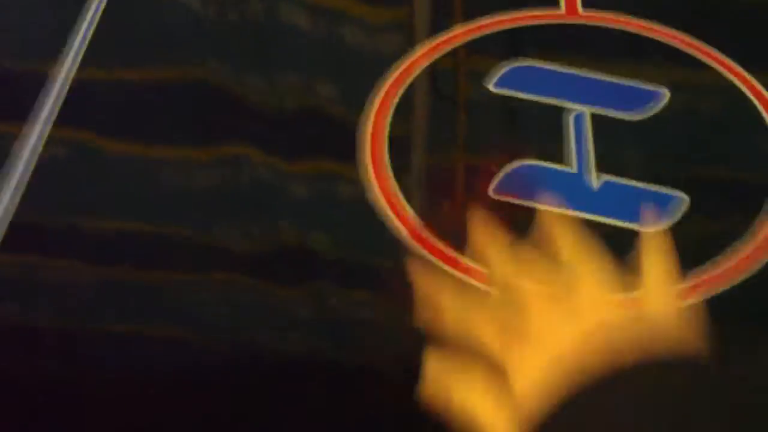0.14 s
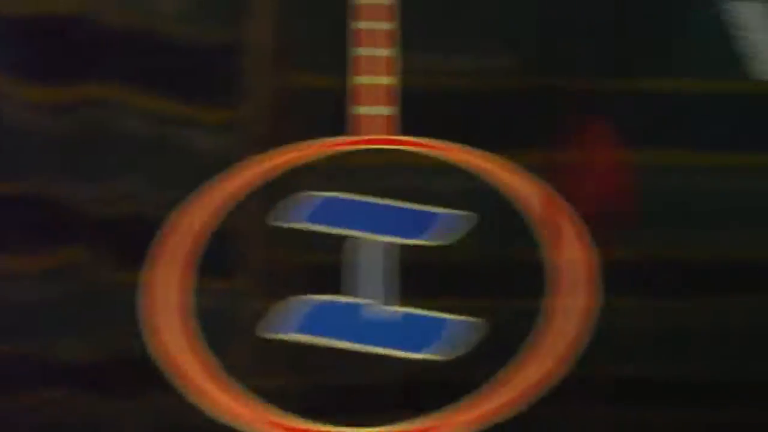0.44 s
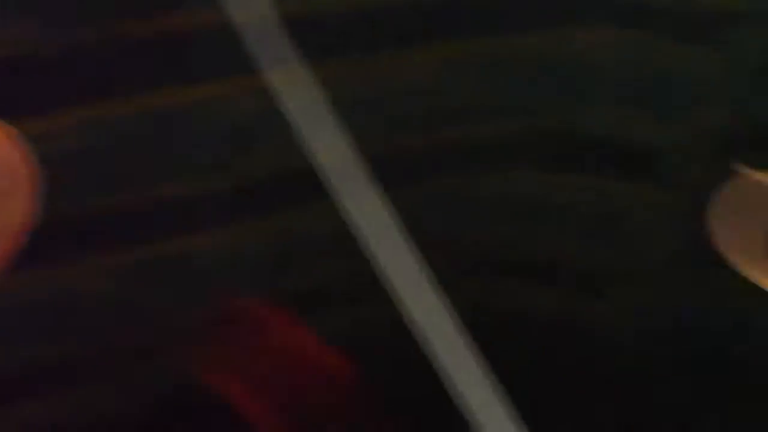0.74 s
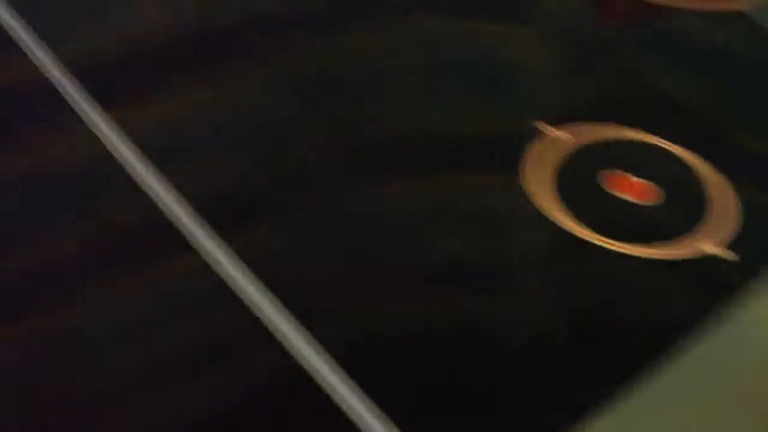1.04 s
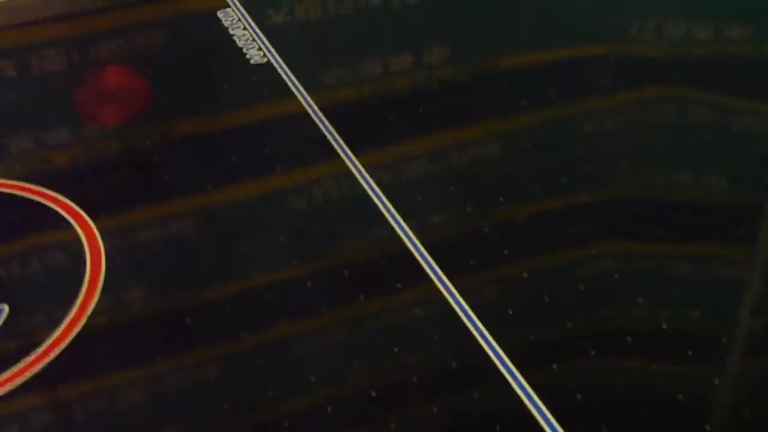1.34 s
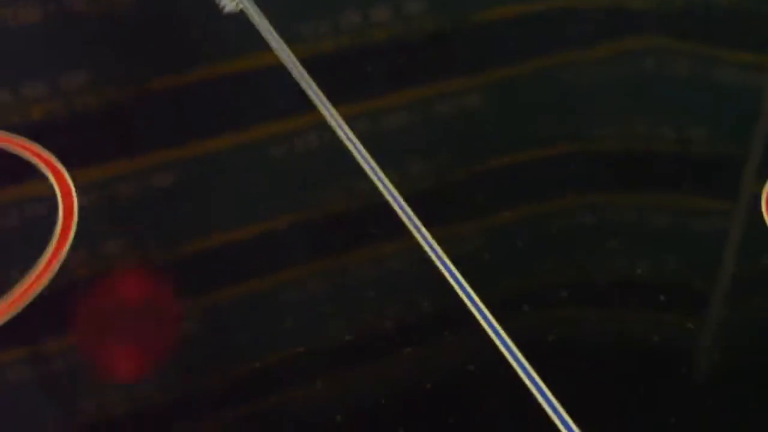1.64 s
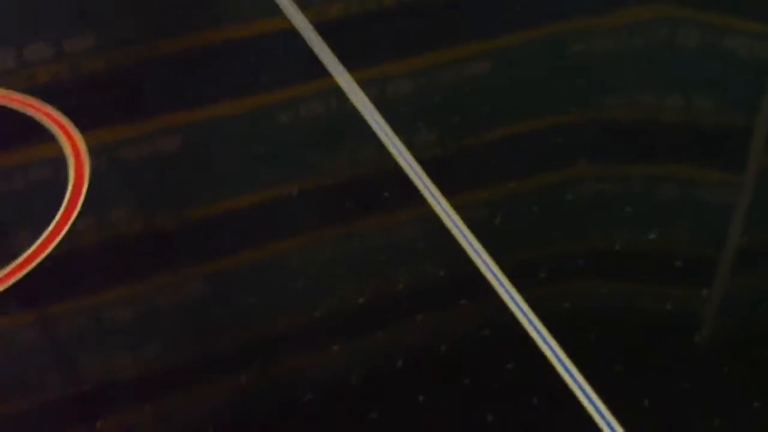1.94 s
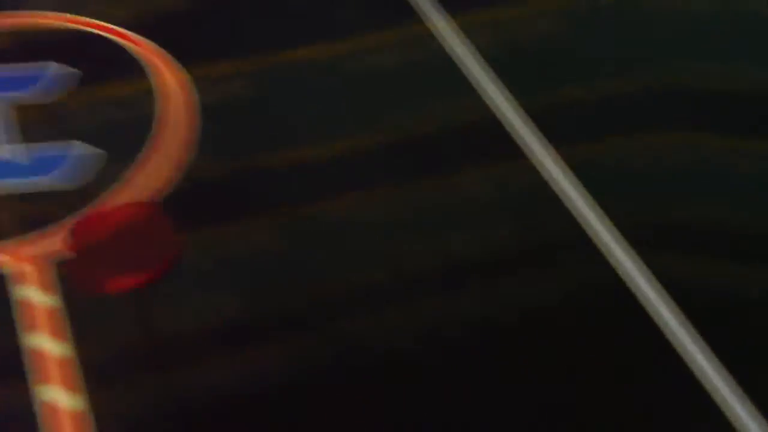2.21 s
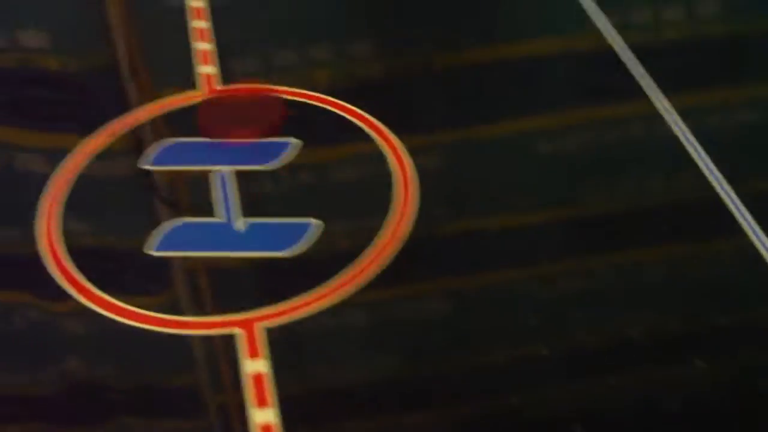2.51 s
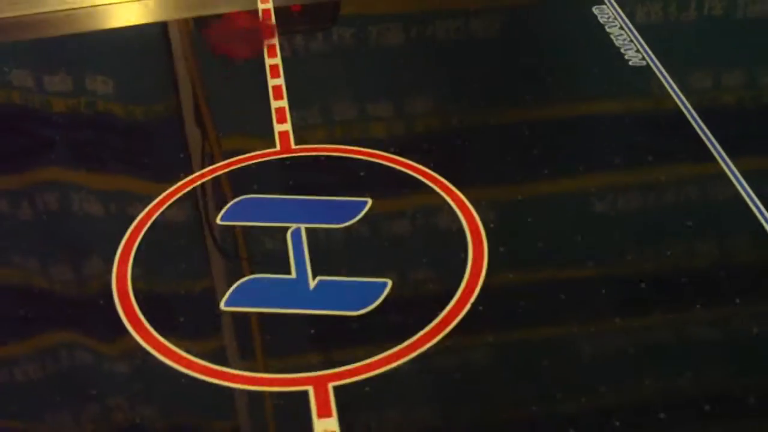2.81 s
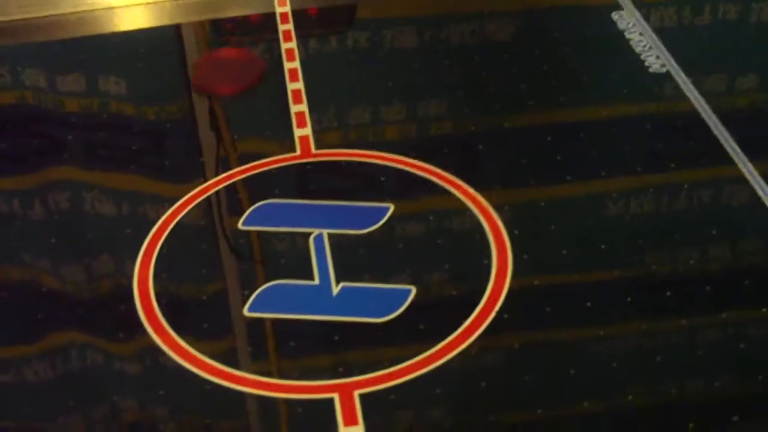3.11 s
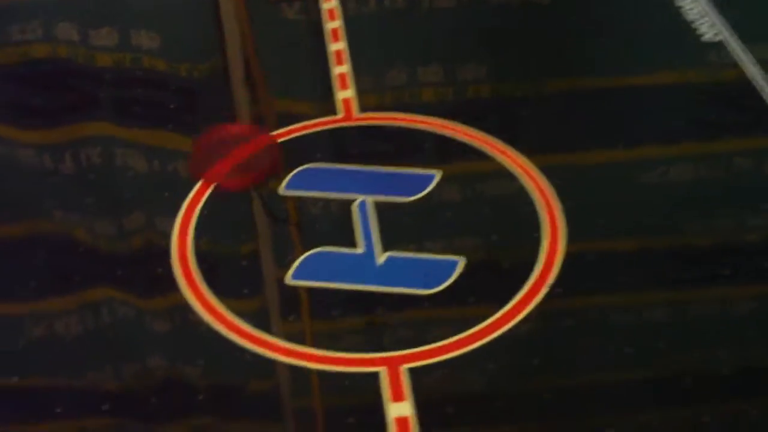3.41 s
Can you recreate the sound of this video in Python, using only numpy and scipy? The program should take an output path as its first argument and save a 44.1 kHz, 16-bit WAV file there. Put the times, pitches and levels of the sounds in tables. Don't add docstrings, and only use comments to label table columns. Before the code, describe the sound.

Close to an air hockey table in a small room, a soft palm thump precedes sharp puck cracks and duller knocks, the last loud and dark, over steady blower hum, heard through a small overloaded microphone.

```python
import sys
import numpy as np
from scipy import signal
from scipy.fft import rfft, irfft, next_fast_len
from scipy.io import wavfile
from scipy.ndimage import uniform_filter1d, map_coordinates

SR = 44100
rng = np.random.default_rng(int(sys.argv[2]) if len(sys.argv) > 2 else 0)


def how_loud(loudness_db):
    steps = np.asarray(loudness_db, float) / 20
    return 10 ** steps


def generate_wav(signal):
    frames = np.transpose(np.atleast_2d(signal))
    scaled = np.clip(frames, -1, 1) * 32767
    pcm = np.round(scaled).astype(np.int16)
    wavfile.write(sys.argv[1], SR, pcm)


N = 156996


def unit(x):
    return x / np.sqrt(np.mean(x ** 2) + 1e-20)


def along(points, hz):
    f, value = np.transpose(points)
    return np.interp(np.log(hz + 1), np.log(f + 1), value)


def wobble(rate):
    knots = rng.standard_normal(int(N * rate / SR) + 4)
    return map_coordinates(knots, [np.arange(N) * rate / SR])


def filtered(x, response):
    size = next_fast_len(len(x) + 8192)
    return irfft(rfft(x, size) * response(np.fft.rfftfreq(size, 1 / SR)), size)[:len(x)]


def rush(response, patchy_db):
    noise = signal.stft(rng.standard_normal(N), nperseg=512)[2]
    patches = uniform_filter1d(rng.standard_normal(noise.shape), size=6, axis=0)
    patches = unit(uniform_filter1d(patches, size=12, axis=1))
    air = signal.istft(noise * how_loud(patchy_db * patches), nperseg=512)[1][:N]
    return unit(filtered(air, response))


def ring(modes, t):
    total = 0
    for hz, db, t60 in modes:
        fade = how_loud(db + 1.7 * rng.standard_normal() - 60 * t / t60)
        total = total + fade * np.sin(2 * np.pi * hz * t + 0.5 * rng.standard_normal())
    return total


def room(x):
    # f/Hz, time to fall 60 dB t60/s
    decay = [(250, 0.23), (800, 0.25), (2500, 0.22), (6000, 0.23)]
    hz, t, noise = signal.stft(rng.standard_normal(SR // 2), SR, nperseg=256)
    fade = how_loud(-60 * t / along(decay, hz)[:, None])
    tail = signal.istft(noise * fade, SR, nperseg=256)[1]
    delayed = np.pad(x, (round(0.006 * SR), 0))
    return signal.fftconvolve(delayed, tail / np.linalg.norm(tail))[:len(x)]


def blower():
    # t/s, level/dB
    nearness = [(0.0, -26.5), (1.15, -27.5), (2.09, -27.5), (2.88, -27.5), (3.04, -28), (3.56, -27)]
    # f/Hz, rms level/dB
    tones = [(119.75, -21), (237, -34), (57.6, -42)]
    # f/Hz, width/Hz, rms level/dB
    cabinet = [(142.7, 27, -30), (194.4, 3, -36), (289, 17, -31), (480, 60, -31.5), (724.5, 44, -30.5),
               (872, 17, -37), (950, 14, -35.5), (1057, 27, -40.5), (1357, 50, -43)]
    # f/Hz, level/dB per Hz
    rumble_colour = [(12, -65), (20, -10), (64, -18), (119, -2.5), (168, -13.5), (289, -9), (383, -13.5),
                     (870, -14.5), (1300, -32.5), (1690, -60.5), (2860, -120)]
    # f/Hz, level/dB per Hz
    hiss_colour = [(650, -17), (1100, 13), (1190, -31), (1380, 9), (1440, 8.5), (1810, -4), (2350, 3),
                   (5730, -49.5), (7450, -59), (12600, -120)]

    t = np.arange(N) / SR
    level_db = np.interp(t, *np.transpose(nearness))
    level_db = level_db - level_db.mean()
    hum = 0
    for hz, db in tones:
        strength = np.sqrt(2) * how_loud(db + 0.3 * wobble(4))
        hum = hum + strength * np.sin(2 * np.pi * hz * t + 0.75 * wobble(10))
    air = 0
    for hz, width, db in cabinet:
        resonance = lambda f: 1j * f * width / (hz * hz - f * f + 1j * f * width)
        air = air + how_loud(db) * rush(resonance, patchy_db=3.34)
    rumble = how_loud(-27) * rush(lambda f: how_loud(along(rumble_colour, f)), patchy_db=1.5)
    hiss = how_loud(-39.5 + 0.6 * wobble(14)) * rush(lambda f: how_loud(along(hiss_colour, f)), patchy_db=4.4)
    return how_loud(0.4 * level_db) * hum + how_loud(level_db) * (air + rumble + hiss)


def hand():
    # t/s, level/dB, 0 palm or 1 nail
    touches = [
        (0.1389, -5, 0),
        (.252, -16.5, 1),
        (2.358, -29.5, 1),
    ]
    # f/Hz, level/dB, t60/s
    palm_modes = [(633, 1, .09), (658, -4, 0.074), (800, -8.5, .05), (1020, -5, 0.045), (1386, -12.5, .04),
                  (2160, -14.5, .03), (2700, -24, .03), (4600, -31.5, .04), (5750, -27, 0.047)]
    # f/Hz, level/dB, t60/s
    tick_modes = [(950, 3.5, .015), (1723, 5, 0.012), (2500, -9, 0.0046), (3100, -2, .012), (4220, -6, .01),
                  (5300, -0.5, 0.0041), (7130, 8, .012)]
    # t/s, level/dB
    slide = [(0, -76.5), (.1, -33), (.2, -36.5), (.26, -58), (.3, -90)]
    # f/Hz, level/dB per Hz
    slide_colour = [(900, -68.5), (1600, -2), (2200, 5), (3500, -9), (5800, -22), (7000, -48.5)]

    out, t = np.zeros(N + SR), np.arange(SR // 2) / SR
    for start_s, db, nail in touches:
        if nail > 0.5:
            snap = how_loud(3 - 60 * t / 0.023) * rng.standard_normal(len(t))
            touch = (ring(tick_modes, t) + snap) * (1 - np.exp(-t / 0.0008))
        else:
            touch = ring(palm_modes, t) * (1 - np.exp(-t / 0.0024))
        out[round(start_s * SR):][:len(t)] += how_loud(db) * (touch + how_loud(-11) * room(touch))
    brush = rush(lambda f: how_loud(along(slide_colour, f)), patchy_db=6)
    return out[:N] + how_loud(np.interp(np.arange(N) / SR, *np.transpose(slide))) * brush


def blows(rows, focus_db, frame_db):
    # f/Hz, level/dB, t60/s
    frame_modes = [(308, 8.5, 0.16), (418.5, 0, 0.13), (537, 1.5, 0.037), (622.5, -3, 0.055),
                   (695.6, -0.5, .045), (755, -0.2, .045), (899, 2.4, 0.053), (974, -0.5, 0.062),
                   (1144, -9.5, 0.024), (1344, 8, 0.017), (1587, -4.5, 0.059)]
    # f/Hz, level/dB, t60/s
    puck_modes = [(1860, -7, 0.012), (2360, -17.5, 0.0054), (2960, -9, .01), (3870, -10.5, .008),
                  (4540, -10.5, 0.005)]
    # f/Hz, level/dB per Hz
    shake_colour = [(150, -45), (250, -12.5), (469, 1), (891, -1), (1880, -10.5), (2900, -13),
                    (4650, -32.5), (5730, -39.5), (7450, -67), (12600, -120)]

    out, t = np.zeros(N + SR), np.arange(SR // 2) / SR
    rise = 1 - np.exp(-t / 0.00091)
    for start_s, db, favoured_hz, bright_db, room_db in rows:
        colour = lambda f: how_loud(along(shake_colour, f) + bright_db / (1 + (1500 / (f + 1)) ** 4))
        shake = how_loud(-4 - 60 * t / 0.1) * unit(filtered(rng.standard_normal(len(t)), colour))
        frame = [(hz, g - focus_db * np.log2(hz / favoured_hz) ** 2, t60) for hz, g, t60 in frame_modes]
        knock = how_loud(frame_db) * ring(frame, t) * rise
        rattle = (how_loud(bright_db) * ring(puck_modes, t) + shake) * rise
        answer = room(rattle + how_loud(-1) * knock)
        blow = knock + rattle + how_loud(room_db - 3.5) * answer
        out[round(start_s * SR):][:len(t)] += how_loud(db + 2.5) * blow
    return out[:N]


def puck():
    # t/s, level/dB, favoured pitch f/Hz, brightness/dB, room level/dB
    knocks = [
        (1.239, 0.5, 691, -0.5, 0.7),
        (2.973, -3.5, 923, -3.5, -1.5),
        (3.528, 1.5, 600, -16, 0),
    ]
    # t/s, level/dB, favoured pitch f/Hz, brightness/dB, room level/dB
    cracks = [
        (.376, 6.5, 800, 2, 2.4),
        (.734, 4.5, 950, 4, 2.2),
        (1.972, -0.5, 803, 5, -1.5),
    ]
    return blows(knocks, focus_db=37, frame_db=0.5) + blows(cracks, focus_db=12.5, frame_db=-7)


def scene():
    return (blower() + puck() + hand())[None]


def clipped(x, top):
    hardness = 48
    return x / (1 + np.abs(x / top) ** hardness) ** (1 / hardness)


def starved(x, size=2048):
    # f/Hz, step/dB
    coarse = [(2400, -25), (3000, 1), (3700, 9), (5000, 10), (6000, 10), (7000, 12)]
    k, n = np.arange(size // 10, size // 3), np.arange(2 * size)
    window = np.sin(np.pi * (n[:, None] + 0.5) / (2 * size))
    basis = window * np.cos(np.pi / size * np.outer(n + 0.5 + size / 2, k + 0.5))
    at = np.arange(N // size + 2)[:, None] * size + n
    lines = np.pad(x, (size, 3 * size))[at] @ basis
    band = np.sqrt(np.abs(uniform_filter1d(lines ** 2, size=24, axis=1))) + 1e-9
    chance = rng.standard_normal((len(lines), len(k) // 12 + 1))
    chance = np.repeat(chance, 12, axis=1)[:, :len(k)]
    step = band * how_loud(along(coarse, (k + 0.5) * SR / (2 * size)) + 4 * chance)
    rounded = np.sign(lines) * np.floor(np.abs(lines) / step + 0.53) * step
    loud = np.linalg.norm(lines, axis=1)
    calm = loud < 1.4 * np.append(loud[0], loud[:-1])
    error = ((rounded - lines) * calm[:, None]) @ basis.T * 2 / size
    return x + np.bincount(at.ravel(), error.ravel())[size:size + N]


def top_cut(x):
    return signal.sosfilt(signal.butter(12, 7100, fs=SR, output="sos"), x)


def record(dry):
    # f/Hz, level/dB
    treble_loss = [(100, 0), (5000, 0), (5800, -6), (6500, -15), (7500, -36), (20000, -70)]
    overloaded = clipped(dry[0], top=1.6)
    dulled = filtered(overloaded, lambda f: how_loud(along(treble_loss, f)))
    mix = np.clip(starved(dulled), -1, 1)[None]
    return top_cut(mix)


dry = scene()
out = record(dry)
generate_wav(out)
```